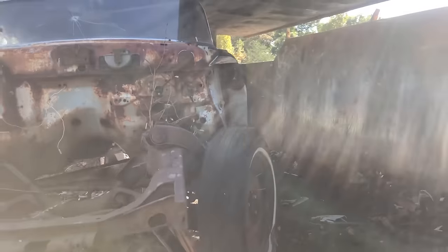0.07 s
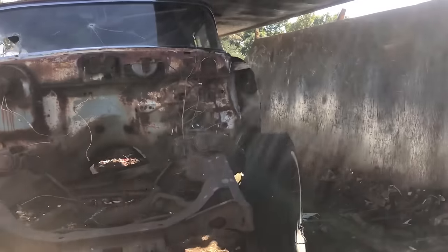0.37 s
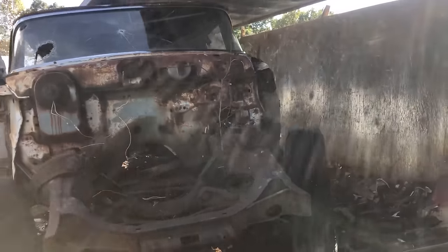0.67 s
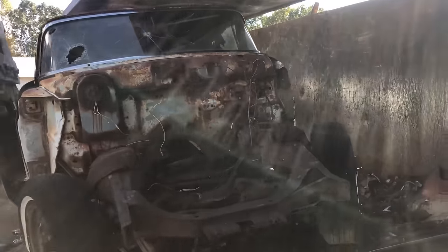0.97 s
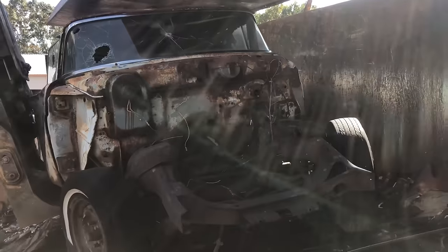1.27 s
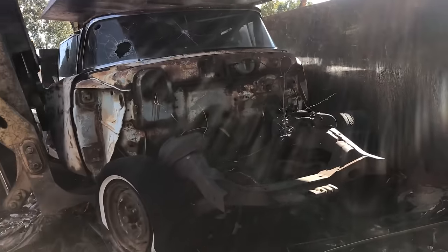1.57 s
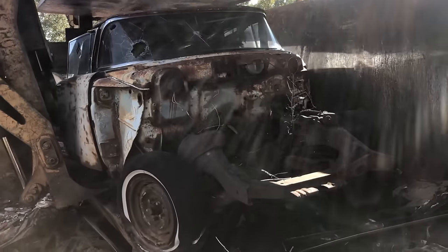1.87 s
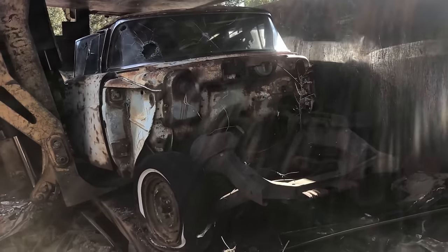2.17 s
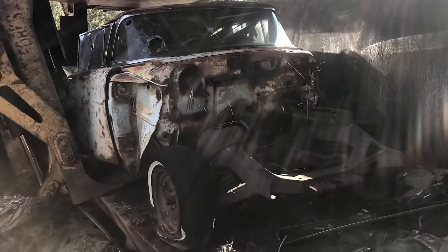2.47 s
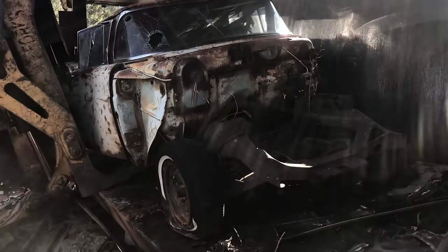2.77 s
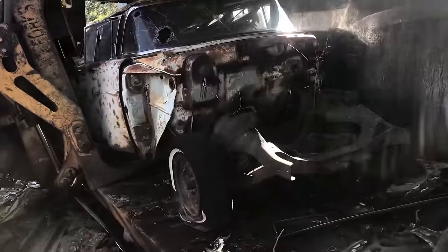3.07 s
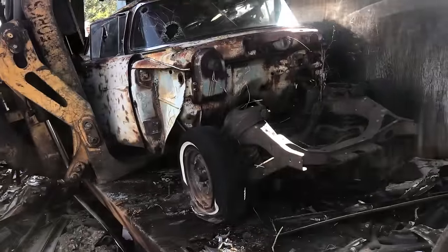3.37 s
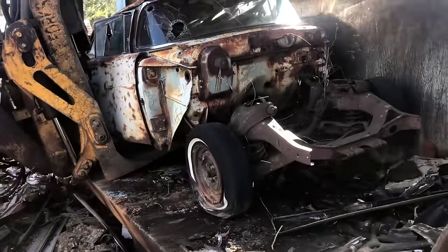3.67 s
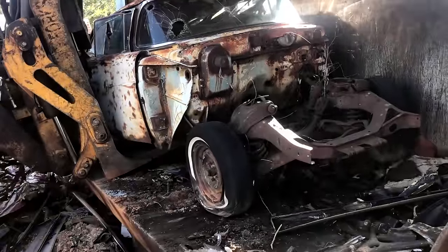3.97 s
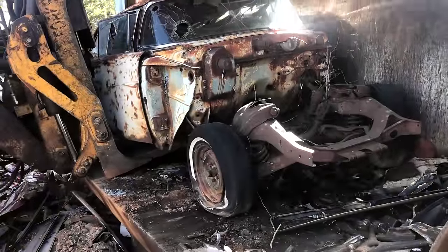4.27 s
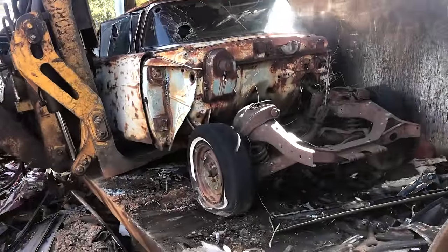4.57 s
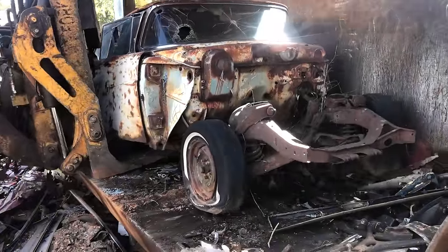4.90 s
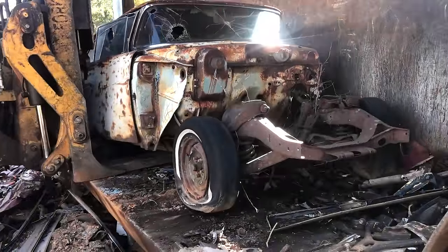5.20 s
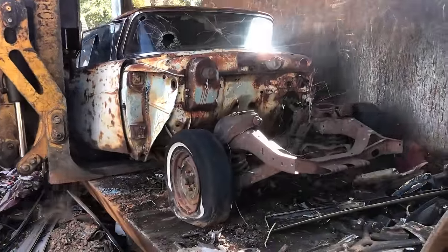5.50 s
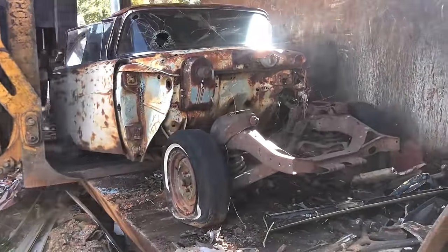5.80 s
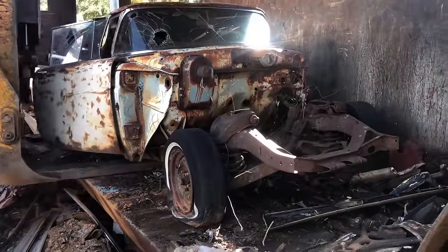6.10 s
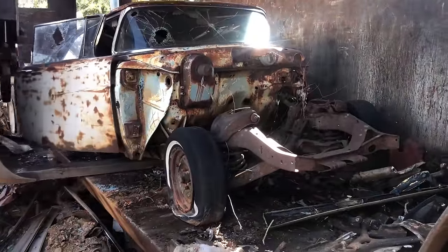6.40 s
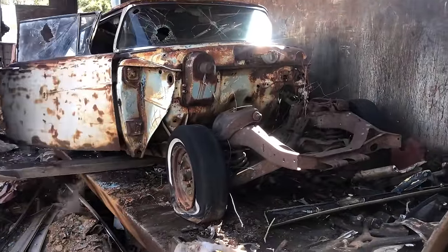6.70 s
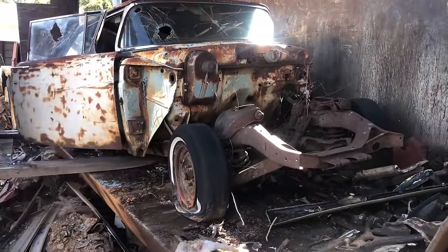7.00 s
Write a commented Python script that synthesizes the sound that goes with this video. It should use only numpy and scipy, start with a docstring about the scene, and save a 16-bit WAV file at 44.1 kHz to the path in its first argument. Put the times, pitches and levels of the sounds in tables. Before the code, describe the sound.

Diesel engines drone and throb while a car wreck is shifted, with metal knocks, thuds and debris grinding and snapping.

```python
"""Moving a wreck in a scrapyard

Two diesel engines run at nearly the same speed, so their drone throbs about three times a second.
A labouring loader, its exhaust beating against theirs, sets a rusty car shell down in a concrete bay
and draws its forks out. The wreck knocks and thuds, debris grinds and snaps beneath it, steel squeaks,
and the forks judder along its floor pan."""
import sys
import numpy as np
from scipy import signal
from scipy.fft import rfft, irfft, next_fast_len
from scipy.io import wavfile
from scipy.ndimage import uniform_filter1d

SR = 44100
rng = np.random.default_rng(int(sys.argv[2]) if len(sys.argv) > 2 else 0)


def unload_audio(sound):
    """Save the sound as a 16-bit wav file, at the path given as the first command line argument."""
    columns = np.transpose(np.atleast_2d(sound))
    # keep every value between -1 and 1, then stretch to whole-number steps
    steps = np.round(np.clip(columns, -1, 1) * 32767)
    wavfile.write(sys.argv[1], SR, steps.astype(np.int16))


N = 319725
T = np.arange(N) / SR

# The tones of each engine. Each row: multiple of its four-stroke cycle rate, level in dB.
NEAR_TONES = [(5, -36), (6, -48), (8, -15.5), (9, -50.5), (10, -42), (12, -33.5), (15, -43), (18, -49.5),
              (20, -40), (53, -46), (60, -45.5), (62, -50.5), (65, -50), (71, -57)]
FAR_TONES = [(6, -30.5), (8, -31.5), (12, -38.5), (24, -44.5)]
# The loader's engine hunts and sags under load. Each row: time in seconds, firings per second.
LOADER_FIRING = [(0.0, 60.7), (0.55, 60.52), (0.85, 62.76), (1.39, 60.08), (1.77, 61.75), (2.06, 59.56),
                 (3.01, 60.52), (3.15, 61.79), (4.14, 60.55), (4.28, 63.55), (4.59, 59.78), (5.12, 59.83),
                 (5.55, 57.62), (5.78, 62.34), (6.01, 54.66), (6.18, 61.58), (7.25, 61.45)]
# The tone colours of the noises. Each row: frequency in Hz, relative level in dB.
VALVE_COLOUR = [(150, -13.5), (350, 3.5), (600, 3), (950, 1.5), (1300, 4), (1700, -8.5), (2500, -16),
                (5000, -31.5), (12000, -53)]   # injectors and valves
RUSH_COLOUR = [(25, -42), (55, -5), (105, 2), (160, 2), (220, 3.5), (290, -6), (600, -11), (1200, -6),
               (1700, -13.5), (2200, -13.5), (3000, -20.5), (4500, -24.5), (8000, -37), (15500, -53.5)]   # fans and exhaust
GRIND_COLOUR = [(25, -38), (70, -1), (130, -5.5), (210, 2.5), (400, 0), (700, -4.5), (1200, -10.5),
                (2300, -16), (4000, -26), (9000, -55)]   # rumble through the shell
GRIT_COLOUR = [(600, -9.5), (2000, 7), (4000, 5.5), (7500, 1.5), (11000, -6.5), (15500, -20)]   # debris breaking
THUD_COLOUR = [(20, -28), (45, 3), (90, 1), (170, 16), (260, 2.5), (450, 1), (1200, -52)]   # the wreck settling
RASP_COLOUR = [(200, 0), (600, -17), (1300, -5), (2600, -1), (5000, -9.5), (10000, -23), (15500, -52)]   # forks scraping
# Shoves over the debris. Each row: start and length in seconds, relative grind and grit levels in dB.
SHOVES = [(2.12, 0.59, -52, -47.5), (2.575, 0.27, -33.5, -43), (3.38, 0.32, -30, -45.5),
          (4.025, 0.27, -31.5, -51), (4.226, 0.29, -26, -45.5), (4.614, 0.41, -25.5, -44.5),
          (4.957, 0.18, -23.5, -40.5), (5.183, 0.075, -24, -39), (5.297, 0.33, -30.5, -39.5),
          (5.857, 0.075, -32.5, -38.5), (5.94, 0.085, -32, -33), (6.702, 0.41, -44, -46),
          (6.923, 0.096, -32, -45)]
# Knocks on the shell. Each row: start in seconds, relative level in dB, the panel's pitch in Hz.
PANEL_KNOCKS = [(2.074, -24, 976), (2.583, -17, 386), (2.622, -21.5, 810), (3.385, -21, 416),
                (3.586, -22, 604), (3.716, -17, 723), (4.253, -13.5, 735), (4.314, -22, 790),
                (4.356, -19, 1010), (4.989, -14, 490), (5.085, -14.5, 920), (5.100, -10, 448),
                (5.190, -11, 702), (5.213, -29, 1880), (5.402, -15.5, 1460), (5.578, -24, 624),
                (6.61, -24.5, 1474), (6.775, -30.5, 2010), (7.02, -23.5, 1500)]
# Rust and glass snapping. Each row: start in seconds, relative level in dB,
# relative brightness in dB per octave.
DEBRIS_SNAPS = [(2.085, -35, 3), (2.418, -34, 6), (3.081, -40, 11), (3.206, -41, 5), (3.450, -35, 10),
                (3.463, -32.5, 8), (3.516, -26, 5), (3.579, -35, 7), (3.592, -31, 3), (3.642, -32, 2),
                (3.784, -33, 6), (3.967, -34, 3), (4.252, -22.5, -1.5), (4.286, -24.5, -0.5),
                (4.313, -27, 0.5), (4.355, -23.5, 0), (4.433, -29, -1), (4.585, -19, -2.5),
                (4.631, -21, -1.5), (4.658, -24, 6), (4.766, -19, 6.5), (4.908, -31, 5), (4.975, -28.5, 3),
                (5.084, -25.5, 0), (5.210, -19, -3), (5.293, -30, 1.5), (5.402, -28, 13), (5.581, -31, 3),
                (5.726, -35.5, 6), (6.05, -29, 7), (6.400, -28.5, -1), (6.95, -31, 0.5), (7.158, -26, -1.5)]
# The wreck's weight settling. Each row: start in seconds, level in dB.
WRECK_THUDS = [(2.589, -10.5), (2.676, -18), (2.734, -22), (4.75, -16), (5.189, -17), (5.248, -20)]
# Steel rubbing on steel. Each row: loudest moment in seconds, level in dB, pitch in Hz.
STEEL_SQUEAKS = [(2.749, -40, 4600), (2.759, -30.5, 2310), (6.118, -35, 3000), (6.855, -48, 10500)]
# Forks slipping. Each row: loudest moment in seconds, level in dB, half length in seconds,
# harshness in dB.
FORK_SLIPS = [(5.593, -21.5, 0.009, -17), (5.668, -20, 0.016, -0.5), (5.851, -28, 0.019, 1.5),
              (5.98, -23.5, 0.0071, -0.5), (6.151, -23.5, 0.014, 1)]
# The floor pan's ringing tones. Each row: pitch in Hz, width in Hz, relative level in dB.
PAN_TONES = [(616, 92, 4), (1035, 40, -1), (1246, 170, -2.5), (1490, 680, -7.5), (2220, 35, -23),
             (3100, 260, -21)]


def from_db(db):
    """Turn decibels into a gain."""
    return 10 ** (np.asarray(db) / 20)


def rms_one(x):
    """Scale a signal to an average (rms) level of 1."""
    return x / np.sqrt(np.mean(x ** 2) + 1e-20)


def tone(cycles):
    """A sine wave with an average level of 1, from a running count of cycles."""
    return np.sqrt(2) * np.sin(2 * np.pi * cycles)


def drift(hz):
    """A smooth random wobble of about 1 either way; more Hz makes it quicker."""
    r = np.exp(-2 * np.pi * hz * 40 / SR)   # one value every 40 samples
    slow = signal.lfilter([1], [1, -2 * r, r * r], rng.standard_normal(N // 40 + 4002))[4000:]
    return np.interp(np.arange(N) / 40, np.arange(len(slow)), rms_one(slow))


def coloured(x, colour, tilt_db=0):
    """Give a signal a tone colour, tilted in dB per octave, at an average level of 1."""
    size = next_fast_len(len(x))
    octave = np.log2(np.fft.rfftfreq(size, 1 / SR) + 1)
    hz, db = np.transpose(colour)
    gain = from_db(np.interp(octave, np.log2(hz), db) + tilt_db * octave)
    return rms_one(irfft(rfft(x, size) * gain, size)[:len(x)])


def resonance(x, hz, width):
    """Let a signal ring in a band around one pitch."""
    r = np.exp(-np.pi * width / SR)
    feedback = [1, -2 * r * np.cos(2 * np.pi * hz / SR), r * r]
    return signal.lfilter(np.array([1, 0, -1]) * (1 - r * r) / 2, feedback, x + 1e-18)


def grains(per_s, spread_db, size=N):
    """Random tiny clicks: many small, a few large."""
    strength = from_db(spread_db * np.minimum(rng.exponential(1, size), 4))
    return (rng.random(size) < per_s / SR) * strength * rng.choice([-1, 1], size)


def dying(t60, size):
    """A fade that falls by 60 dB in t60 seconds."""
    return from_db(-60 * T[:size] / t60)


def swell(s, half_s):
    """A short smooth rise and fall around a moment."""
    return 1 / np.cosh(((T - s) / half_s).clip(-20, 20))


def add(out, s, sound):
    """Mix a sound in, starting at s seconds."""
    start = int(s * SR)
    out[start:start + len(sound)] += sound[:N - start]


def drone(near, far):
    """Each engine hums at multiples of its cycle rate; tones that nearly match throb together."""
    offsets = rng.random(100)
    out = np.zeros(N)
    for cycles, tones in (near, NEAR_TONES), (far, FAR_TONES):
        for multiple, db in tones:
            out += from_db(db) * tone(multiple * cycles + offsets[round(multiple)])
    return out


def exhaust_boom(near, near_db=-30, loader_db=-29.5, in_step_s=0.26):
    """The loader's firing beats against the near engine's, faster as the loader sags."""
    loader = np.cumsum(np.interp(T, *np.transpose(LOADER_FIRING))) / SR
    out = np.zeros(N)
    for firings, db in (4 * near, near_db), (loader, loader_db + 1.4 * drift(3)):
        out += from_db(db) * tone(firings - np.interp(in_step_s, T, firings))
    return out


def gear_whine(far, level_db=-40, teeth=80):
    """A timing gear whines as its teeth meet, and takes the load once in each engine cycle."""
    load = 1 + 0.56 * np.cos(2 * np.pi * far)
    return from_db(level_db + 2 * drift(11)) * load * tone(teeth * far)


def valves_and_air(near, cycle_hz, valves_db=-4.5):
    """Valve clatter repeats on every engine cycle, while the rush of air is always new."""
    cycle = rng.standard_normal(int(SR / cycle_hz))
    repeating = np.interp(near * len(cycle), np.arange(len(cycle)), cycle, period=len(cycle))
    pulsing = 1 + 0.18 * (np.cos(2 * np.pi * 5 * near) + np.cos(2 * np.pi * 15 * near))
    valves = from_db(valves_db) * coloured(repeating, VALVE_COLOUR) * pulsing
    air = coloured(rng.standard_normal(N), RUSH_COLOUR)
    rise_db = np.interp(T, [0.8, 2.4], [0, 1.37])   # the listener steps out from behind the wreck
    return from_db(-29.5 + rise_db) * (air + valves)


def engines(near_hz=15.7625, far_hz=15.3685):
    """All the diesel sounds follow the engines' cycles; governors let the speeds wander slightly."""
    t = T - 0.16
    near = near_hz * t + 0.0042 * drift(0.53) + 0.0012 * drift(4.6)   # running counts of cycles
    far = far_hz * t + 0.0019 * drift(1.07)
    return drone(near, far) + exhaust_boom(near) + gear_whine(far) + valves_and_air(near, near_hz)


def shoves(rise_s=0.028, t60=0.38):
    """How strong the grind and grit are: each shove builds, holds and fades over a slow creep."""
    creep = np.interp(T, [1.83, 2.03], [0, 1])
    grind_power, grit_power = (creep * from_db(-45)) ** 2, (creep * from_db(-53.5)) ** 2
    for s, length, grind_db, grit_db in SHOVES:
        fade = from_db(-60 * (T - s - length).clip(0, 2) / t60)
        shape = ((T - s) / rise_s).clip(0, 1) * fade
        grind_power += (shape * from_db(grind_db)) ** 2
        grit_power += (shape * from_db(grit_db)) ** 2
    return np.sqrt(grind_power), np.sqrt(grit_power)


def dragging(flake_t60=0.031):
    """Countless tiny breaks rumble through the shell; grit hisses and flakes crack one by one."""
    grind, grit = shoves()
    rumble = coloured(grains(per_s=2500, spread_db=2), GRIND_COLOUR)
    rumble *= from_db(1 + 1.5 * np.tanh(drift(20)))
    hiss = coloured(grains(per_s=6500, spread_db=2.5), GRIT_COLOUR, tilt_db=0.5)
    flakes = np.abs(grains(per_s=90, spread_db=2.2))
    flake_fades = signal.lfilter([1], [1, -from_db(-60 / (flake_t60 * SR))], flakes)
    crackle = rms_one(flake_fades * coloured(rng.standard_normal(N), GRIT_COLOUR, tilt_db=-2))
    return grind * rumble + grit * (0.68 * hiss + from_db(-3) * crackle)


def knocks(level_db=-3, rise_s=0.00026, t60=0.11, size=22050):
    """A blow rings one panel and a crowd of tones around it, which rust quickly deadens."""
    out, t = np.zeros(N), T[:size]
    shape = dying(t60, size) * (1 - np.exp(-t / rise_s))
    for s, db, hz in PANEL_KNOCKS:
        hump = [(hz / 8, -22), (hz / 2, -5), (hz, 0), (hz * 2, -7), (hz * 4, -17), (hz * 20, -48)]
        ring = coloured(rng.standard_normal(size), hump) + from_db(-3) * tone(hz * t)
        add(out, s, from_db(db + level_db) * ring * shape)
    return out


def snaps(level_db=-4.5, size=16384):
    """Breaking scrap gives a sharp crack, a faint spray of crumbs and a brief ring."""
    out, t = np.zeros(N), T[:size]
    bite = from_db(-5) * dying(0.0074, size)
    crumbs = from_db(-17) * dying(0.29, size)
    for s, db, bright_db in DEBRIS_SNAPS:
        body = dying(0.14 * 2 ** (-bright_db / 6), size)   # brighter pieces are smaller and fade sooner
        noise = coloured(grains(per_s=4000, spread_db=1.5, size=size), GRIT_COLOUR, bright_db - 2)
        crack = (bite + body + crumbs) * noise
        ring_hz = rng.uniform(2130, 4600, size=(8, 1))   # every piece has its own tones
        ring = rms_one(tone(ring_hz * t).sum(axis=0)) * dying(0.082, size)
        ring *= from_db(-7 - bright_db)   # small pieces hardly ring
        add(out, s, from_db(db + level_db) * (crack + ring))
    return out


def thuds(rise_s=0.0096, t60=0.26, size=22050):
    """The wreck's weight settles with deep, soft-edged bumps."""
    out = np.zeros(N)
    shape = dying(t60, size) * (1 - np.exp(-T[:size] / rise_s))
    for s, db in WRECK_THUDS:
        add(out, s, from_db(db) * coloured(rng.standard_normal(size), THUD_COLOUR) * shape)
    return out


def squeaks(half_s=0.0072, waver=0.34):
    """Steel rubs on steel in brief, unsteady tones."""
    return sum(from_db(db) * swell(s, half_s) * tone(hz * T + waver * drift(60))
               for s, db, hz in STEEL_SQUEAKS)


def fork_judder(rasp_db=-6):
    """The forks stick and slip, ringing the floor pan; harsher slips bring out its higher tones."""
    soft, harsh = np.zeros(N), np.zeros(N)
    for s, db, half_s, harsh_db in FORK_SLIPS:
        stroke = from_db(db) * swell(s, half_s)
        soft += stroke
        harsh += stroke * from_db(harsh_db)
    chatter = grains(per_s=6000, spread_db=0)
    out = harsh * from_db(rasp_db) * coloured(chatter, RASP_COLOUR)
    for k, (hz, width, db) in enumerate(PAN_TONES):
        ring = resonance(resonance(chatter, hz, width), hz, width * 4)
        ring /= np.sqrt(uniform_filter1d(ring ** 2, size=2048).clip(1e-18))   # friction holds it steady
        out += from_db(db) * ring * (soft if k == 0 else harsh)
    return out


def concrete_bay(x, echo_db=-9, t60=0.2, size=16384):
    """Concrete walls add a short echo with full bass, a scooped middle and an airy top."""
    tail = coloured(rng.standard_normal(size), [(100, 5), (3000, -12.5), (15000, -2.5)])
    tail *= dying(t60, size) * (T[:size] > 0.008)
    return x + from_db(echo_db) * signal.fftconvolve(x, tail / np.linalg.norm(tail))[:N]


def scene():
    """The engines, and the wreck moving in its bay, in one channel."""
    diesels = engines()
    wreck = dragging() + snaps() + knocks() + thuds() + fork_judder() + squeaks()
    return (diesels + concrete_bay(wreck))[None]


def record(dry, ceiling=0.99, low_cut_hz=34, high_cut_hz=15900):
    """The microphone drops the deepest bass; the tallest peaks are rounded and the top treble is cut."""
    dry = signal.sosfilt(signal.butter(2, low_cut_hz, "high", fs=SR, output="sos"), dry)
    rounded = dry / (1 + (dry / ceiling) ** 8) ** (1 / 8)
    return signal.sosfilt(signal.ellip(12, .1, 90, high_cut_hz, fs=SR, output="sos"), rounded)


dry = scene()
out = record(dry)
unload_audio(out)
```